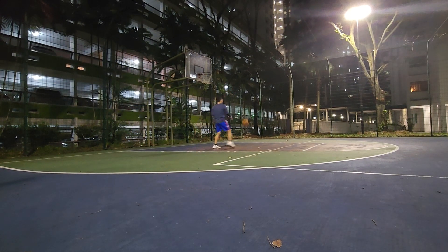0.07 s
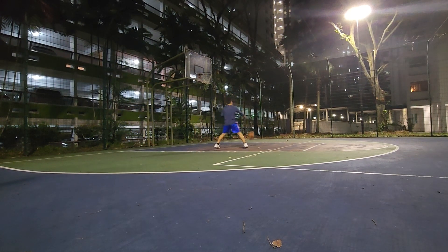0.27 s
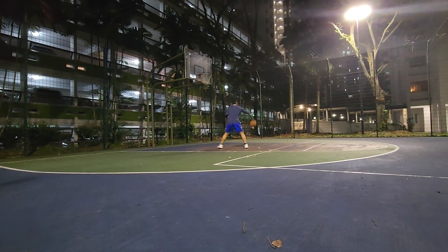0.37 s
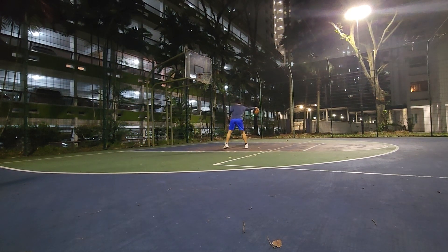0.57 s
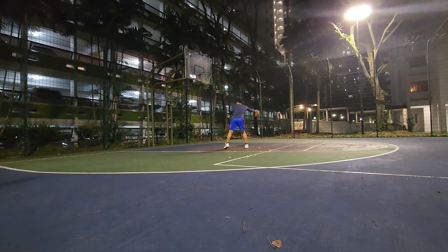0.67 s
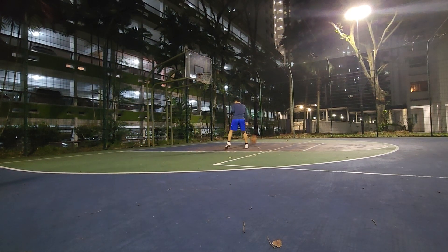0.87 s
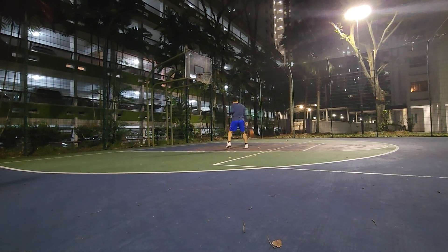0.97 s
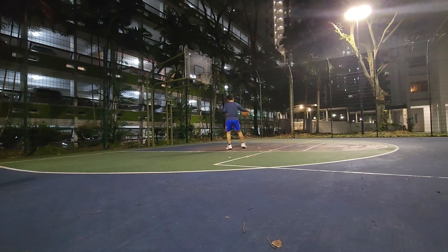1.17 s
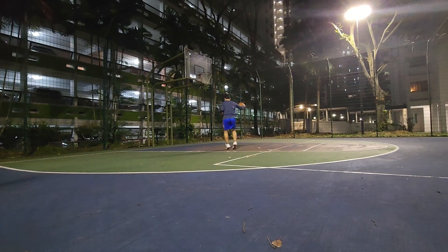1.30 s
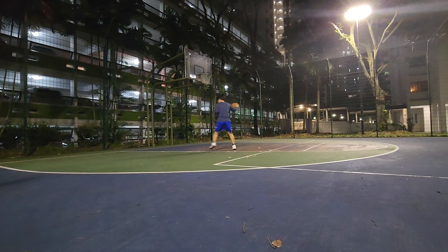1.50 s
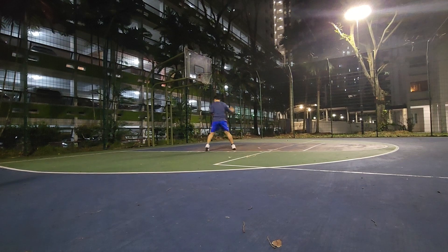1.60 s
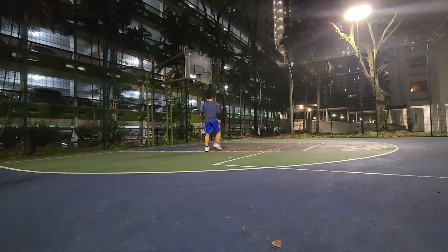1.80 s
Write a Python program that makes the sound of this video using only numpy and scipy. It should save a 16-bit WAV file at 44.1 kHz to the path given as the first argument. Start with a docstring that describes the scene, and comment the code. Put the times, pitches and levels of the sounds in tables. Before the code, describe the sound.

Two basketball bounces outdoors, a sneaker squeaking between them over faint city rumble.

```python
"""A basketball, dribbled twice on a hard outdoor court at night, some metres from a stereo microphone.
Each bounce is a slap of the shell, a short low thump and a ring of the air inside. Shoes thud, scuff
and squeak once as the rubber sticks and slips; a palm taps the ball. The buildings around return a
faint tail over distant city rumble. Late on, a thin high whistle, perhaps an insect, joins on the left."""
import sys
import numpy as np
from scipy import signal
from scipy.fft import rfft, irfft
from scipy.io import wavfile
from scipy.ndimage import uniform_filter1d

SR = 44100
rng = np.random.default_rng(int(sys.argv[2]) if len(sys.argv) > 2 else 0)


def log_audio(samples):
    """Write samples as a 16-bit WAV file to the path given in sys.argv[1]."""
    # one column per channel
    frames = np.atleast_2d(samples).T
    # limit to full scale, then quantise
    limited = np.clip(frames, -1, 1)
    pcm = np.round(limited * 32767).astype(np.int16)
    wavfile.write(sys.argv[1], SR, pcm)


N = 81585
TIME = np.arange(N) / SR
FREQS = np.fft.rfftfreq(N, 1 / SR)


def amp(db):
    """Decibels to gain."""
    return 10 ** (np.asarray(db) / 20)


def unit(x):
    """Scales to rms 1."""
    return x / np.sqrt(np.mean(abs(x) ** 2) + 1e-20)


def read(points, hz):
    """Reads a table on a log-frequency axis."""
    f, value = np.transpose(points)
    return np.interp(np.log(hz + 1), np.log(f + 1), value)


def add(mix, s, sound):
    """Mixes a sound in at time s."""
    part = mix[..., max(round(s * SR), 0):][..., :sound.shape[-1]]
    part += sound[..., :part.shape[-1]]


def pan(db):
    """Stereo gains for a left-minus-right level."""
    return amp(np.array([[db], [-db]]) / 2)


def noise(colour, tilt_db=0):
    """Coloured noise, tilted per octave above 1 kHz."""
    octaves = np.log2(np.maximum(FREQS, 1000) / 1000)
    gain = amp(read(colour, FREQS) + tilt_db * octaves)
    return unit(irfft(rfft(rng.standard_normal(N)) * gain, N))


def stereo_noise(colour, width, tilt_db=0):
    """Shared noise plus some of each side's own."""
    shared = noise(colour, tilt_db)
    sides = np.array([noise(colour, tilt_db) for _ in range(2)])
    return unit(shared + width * sides)


def wander(hz):
    """Smooth random motion up to about this rate."""
    return unit(irfft(rfft(rng.standard_normal(N)) * np.exp(-(FREQS / hz) ** 2), N))


def ring(hz, t60):
    """One damped vibration."""
    return -np.sin(2 * np.pi * hz * TIME) * amp(-60 * TIME / t60)


# Traffic wash, far off (f/Hz, relative level/dB)
WASH_COLOUR = [(15, -2.5), (40, -12.5), (70, -3), (120, -1), (190, -10), (280, -15.5), (450, -20.5),
               (950, -16.5), (1500, -21.5), (2500, -32), (4500, -41), (8000, -46.5), (11000, -53),
               (12000, -58.5), (16000, -60.5)]
# Its likeness at the two microphones (f/Hz, correlation)
WASH_CORRELATION = [(60, 1), (130, 0.934), (290, 0.776), (640, 0.261), (1400, -0.393), (3100, 0.092)]
# Its lean (f/Hz, left minus right/dB)
WASH_PAN = [(50, -2.5), (300, 2.5), (1000, 2.5), (4000, 1.97), (9000, -0.03), (13000, 3.5)]
# Deep rumble beneath it (t/s, level/dB)
RUMBLE_LEVEL = [(0, -61.5), (.25, -38.5), (.45, -86), (.6, -32.5), (.8, -53), (1.03, -39.5), (1.2, -38.5),
                (1.45, -36.5), (1.58, -38), (1.66, -66), (1.85, -60)]
# Rumble spectrum (f/Hz, relative level/dB)
RUMBLE_SPECTRUM = [(15, -16), (36, -12), (60, 3), (90, -6.5), (150, -40.5), (400, -15), (2000, -102.5)]
def city(wash_db=-38.5, patch_db=1):
    """Distant traffic: a wide wash with drifting patches over a swelling, centred rumble."""
    hz = np.fft.rfftfreq(2048, 1 / SR)
    a, b, c, d, patches = rng.standard_normal((N // 512 + 5, len(hz), 5)).T
    patches = uniform_filter1d(patches, size=16, axis=0)  # smooth across frequency
    patches = unit(uniform_filter1d(patches, size=7, axis=1))  # and time
    likeness = np.clip(read(WASH_CORRELATION, hz), -1, 1)[:, None]
    left = a + 1j * b
    right = likeness * left + np.sqrt(1 - likeness ** 2) * (c + 1j * d)
    lean_db = read(WASH_PAN, hz)[:, None] / 2
    spectra = np.array([left * amp(lean_db), right * amp(-lean_db)])
    spectra *= amp(read(WASH_COLOUR, hz)[:, None] + patch_db * patches)
    wash = unit(signal.istft(spectra, nperseg=2048, noverlap=1536)[1][:, :N])
    swell = amp(np.interp(TIME, *np.transpose(RUMBLE_LEVEL)))
    return amp(wash_db) * wash + swell * noise(RUMBLE_SPECTRUM)


# Soles landing, left of the microphone (t/s, level/dB, f/Hz, half length/s)
LANDINGS = [(.255, -29.5, 69.7, 0.0156), (.539, -14, 134.3, 0.0044), (.548, -28.5, 56.1, 0.0233),
            (.585, -31.5, 67.6, 0.022), (.69, -36.5, 209.8, 0.00995), (.83, -39.5, 191.6, 0.0136),
            (1.225, -24, 137.3, 0.01004), (1.473, -23.5, 171.3, 0.00377), (1.508, -30.5, 81, 0.03)]
def thuds():
    """Each landing is a low push of a few cycles."""
    out = np.zeros(N)
    for s, db, hz, half_length in LANDINGS:
        t = TIME - s
        out -= amp(db) * np.sin(2 * np.pi * hz * t) * np.exp(-(t / half_length) ** 2)
    return out * pan(db=6)


# Grit under the ball (f/Hz, relative level/dB)
GRIT_COLOUR = [(200, -12), (1500, 1), (2600, -2), (4500, 0), (7000, -1), (10000, -9), (16000, -17)]
def grit(t60, rise_s=0.0001):
    """Contact with the gritty court: a dying burst of noise of fixed energy."""
    fade = amp(-60 * TIME / t60) * np.minimum(TIME / rise_s, 1)
    return unit(stereo_noise(GRIT_COLOUR, width=1) * fade) * np.sqrt(np.mean(fade ** 2))


# Air modes inside the ball (f/Hz, relative level/dB, t60/s)
AIR_MODES = [(459.4, -4.5, 0.1314), (788, -11.5, 0.0167), (1086.4, -1, 0.064), (1435.3, 3.5, 0.0217),
             (1684, -11.5, 0.063), (2777, -24, 0.104)]
# Bounces, some metres off (t/s, thump/dB, slap/dB, slap f/Hz, grit/dB, snap/dB, lift-off/dB, air/dB)
DRIBBLE = [(0.4672, -11.5, -18.5, 819, -21.5, -27, -16.5, -29),
           (1.1470, -11, -14, 1215, -30, -24.5, -26, -28)]
def ball(thump_hz=132.1, thump_peak_s=0.007413, thump_width_s=0.00558, wall_send_db=16):
    """The shell slaps, squashes and springs back; the air rings. Returns direct and wall-bound sound."""
    body, contact, clicks = np.zeros(N), np.zeros((2, N)), np.zeros(N)
    t = TIME - thump_peak_s
    squash = np.exp(-abs(t / thump_width_s) ** 5.62) * np.minimum(TIME / 0.000114, 1)
    thump = -np.cos(2 * np.pi * thump_hz * t) * squash
    air = sum(amp(db) * ring(hz, t60) for hz, db, t60 in AIR_MODES)
    for s, thump_db, slap_db, slap_hz, grit_db, snap_db, lift_db, air_db in DRIBBLE:
        slap = ring(slap_hz, t60=0.00845)
        crack = grit(t60=0.00766)
        loose_grit = amp(-49.5) * grit(t60=0.162)
        add(body, s, amp(thump_db) * thump + amp(slap_db) * slap + amp(air_db) * air)
        add(body, s + 0.0098, amp(lift_db) * ring(hz=1079, t60=0.0096))  # the shell springs back
        add(contact, s, amp(grit_db) * crack + loose_grit)
        add(contact, s + 0.0019, amp(snap_db - 60 * TIME / 0.0118) * crack)  # a second snap
        # one click carries both snaps to the walls
        add(clicks, s, amp([wall_send_db]) * np.hypot(amp(grit_db), amp(snap_db)))
    return body + contact, body + clicks


# Decay between the buildings (f/Hz, t60/s)
TAIL_DECAY = [(100, 8.3), (1200, 1.47), (4500, 1.0045), (9000, 1.6), (15000, 0.08)]
# Colour of that tail (f/Hz, level/dB)
TAIL_COLOUR = [(100, -25.5), (400, -11), (1300, -7), (4500, -5), (9000, -13.5), (15000, -21)]
# Early reflections at the microphone (delay/s, level/dB)
REFLECTIONS = [(0.015, -25.5), (0.024, -25.5)]
def buildings(sound, build_s=0.01):
    """Walls around the court return two reflections and a thin, diffuse one-second tail."""
    hz, t, spectra = signal.stft(rng.standard_normal((2, SR)), SR, nperseg=256)
    fade = amp(-60 * t / read(TAIL_DECAY, hz)[:, None]) * (1 - np.exp(-t / build_s))
    band_energy = SR * np.mean(fade ** 2, axis=1, keepdims=True)
    fade *= amp(read(TAIL_COLOUR, hz))[:, None] / np.sqrt(band_energy)
    tail = signal.istft(spectra * fade, SR, nperseg=256)[1]
    for delay, db in REFLECTIONS:
        for side in tail:
            add(side, delay + rng.uniform(0, 0.00044), amp([db]))
    return signal.fftconvolve(sound[None], tail, axes=1)[:, :N] * pan(db=1.5)


# Hiss of a sliding sole (f/Hz, relative level/dB)
SOLE_COLOUR = [(300, 0), (1500, -8.5), (3300, 1), (5000, 1), (8000, -3.5), (11000, -14), (13000, -11.5),
               (16000, -13)]
# Slides, near centre (peak t/s, rise/s, fall/s, level/dB, tilt/dB per octave)
SLIDES = [(.53, 0.0156, 0.035, -43.5, -8), (.648, 0.0193, 0.0413, -47.5, 6),
          (.78, 0.086, 0.053, -51.5, 6.5), (0.823, 0.0422, 0.0617, -43.5, -3.5),
          (.89, 0.075, 0.0812, -44, 0.5), (.97, 0.074, .05, -50.5, -2.5), (1.445, 0.0177, 0.0267, -46, -3),
          (1.473, 0.0211, 0.0106, -39, 0), (1.563, 0.0283, 0.045, -50.5, 6),
          (1.842, 0.0245, 0.0236, -47.5, 1)]
def scuffs(grain_db=2, grain_hz=350):
    """Soles drag over grit: grainy hiss that swells and dies."""
    out = np.zeros((2, N))
    for s, rise, fall, db, tilt_db in SLIDES:
        swell = np.exp(-np.where(TIME < s, ((TIME - s) / rise) ** 2, (TIME - s) / fall))
        hiss = stereo_noise(SOLE_COLOUR, width=0.656, tilt_db=tilt_db)
        grain = amp(grain_db * wander(grain_hz))
        out += amp(db) * swell * unit(hiss * grain)
    return out * pan(db=1)


# Modes of a tap (multiple of its pitch, relative level/dB, t60/s)
CLICK_MODES = [(1, -1.5, 0.00484), (1.3, 4.5, 0.00304), (2.0, -2, 0.0029)]
# A shoe on the court twice, then a palm on the ball (t/s, level/dB, f/Hz)
TOUCHES = [(0.5271, -33, 2300), (.5435, -39, 2680), (1.2944, -24.5, 2950)]
def taps(rise_s=0.0003):
    """Sole and palm touch down with small, dry clicks."""
    out = np.zeros(N)
    attack = np.sin(np.pi / 2 * np.minimum(TIME / rise_s, 1)) ** 2
    for s, db, hz in TOUCHES:
        click = sum(amp(mode_db) * ring(hz * ratio, t60) for ratio, mode_db, t60 in CLICK_MODES)
        add(out, s, amp(db) * click * attack)
    return out


# Strokes of one sole on the court (t/s, length/s, first f/Hz, last f/Hz, level/dB, roughness 0-1)
STROKES = [(0.804, .03, 3361, 3736, -39.5, 0.59), (0.828, 0.0162, 4216, 4382, -27, 0.5),
           (.843, 0.01606, 4091, 4053, -19.5, 0.35), (0.856, 0.02692, 4104, 4587, -23, 0.71),
           (0.8837, 0.02533, 4115, 5064, -22, 0.55), (.908, 0.0212, 4390, 4542, -33, 0.62),
           (0.926, 0.0108, 4502, 4954, -29.5, 0.83)]
def squeak(rise_s=0.0039, fall_s=0.002, sag_db=-7, jitter_hz=600, rasp_hz=550):
    """Rubber sticks and slips: each stroke is a rough tone, mostly climbing until the grip breaks."""
    out = np.zeros(N)
    for s, length, first_hz, last_hz, db, rough in STROKES:
        progress = np.minimum(TIME / length, 1)
        glide_hz = first_hz + (last_hz - first_hz) * progress
        jitter = 1 + 0.04 * rough * wander(jitter_hz)
        phase = 2 * np.pi * np.cumsum(glide_hz * jitter) / SR
        grip = np.sqrt(1 - rough ** 2) + rough * unit(wander(rasp_hz) + 1j * wander(rasp_hz))
        harmonics = np.exp(1j * phase) + amp(-24) * np.exp(2j * phase)
        gate = np.clip(np.minimum(TIME / rise_s, (length - TIME) / fall_s), 0, 1)
        add(out, s, amp(db + sag_db * progress) * gate * (grip * harmonics).real)
    return out


def squeak_to_walls(squeal, hz=4325, width_hz=880):
    """The sole radiates most widely in this band, which reaches the buildings."""
    return amp(-4.5) * signal.lfilter(*signal.iirpeak(hz, hz / width_hz, SR), squeal)


# Faint whistle, well left of the microphone (t/s, level/dB)
WHISTLE_LEVEL = [(1.48, -71.5), (1.5, -58.5), (1.55, -61), (1.6, -56.5), (1.679, -63), (1.76, -70.5),
                 (1.85, -66)]
def whistle(hz=13205, flutter_hz=45):
    """A narrow, fluttering high tone, perhaps an insect."""
    flutter = 1 + np.array([wander(flutter_hz) + 1j * wander(flutter_hz) for _ in range(2)])
    tone = unit((flutter * np.exp(2j * np.pi * hz * TIME)).real)
    times, db = np.transpose(WHISTLE_LEVEL)
    return tone * np.interp(TIME, times, amp(db), left=0) * pan(db=12)


def from_right(sound):
    """Sound from slightly right of centre reaches the left microphone a sample later."""
    return np.array([np.roll(sound[0], 1), sound[1]])


def scene():
    """Ball and shoes some metres off, buildings around, the night city beyond."""
    bounces, ball_to_walls = ball()
    squeal = squeak()
    direct = from_right((bounces + taps()) * pan(db=1.17) + scuffs())
    direct += squeal * pan(db=-1) + thuds()
    reflected = buildings(ball_to_walls + squeak_to_walls(squeal))
    return direct + reflected + city() + whistle()


def record(dry):
    """The recorder's band ends at 16 kHz."""
    lowpass = signal.firwin(301, 16000, window=("kaiser", 9), fs=SR)
    return signal.oaconvolve(dry, lowpass[None], "same")


dry = scene()
out = record(dry)
log_audio(out)
```